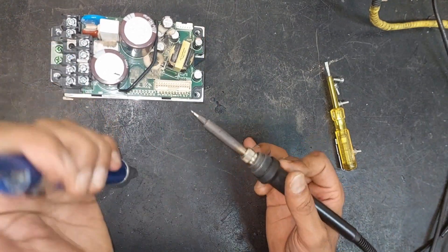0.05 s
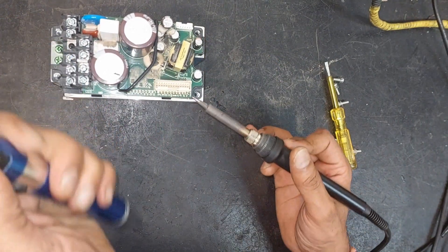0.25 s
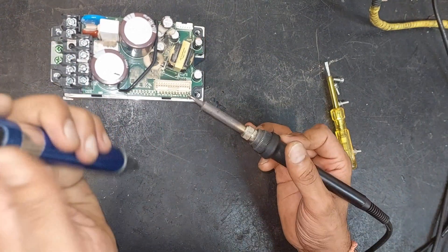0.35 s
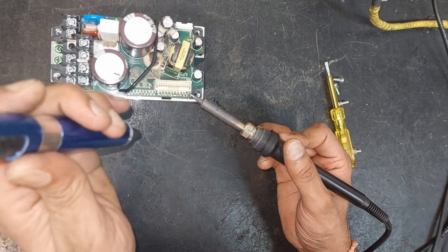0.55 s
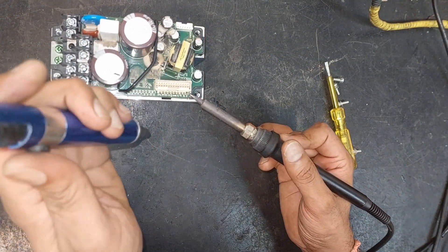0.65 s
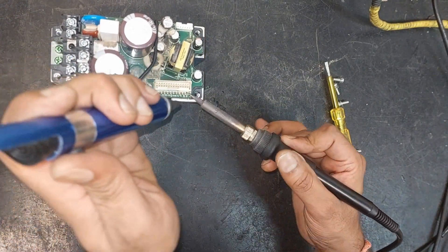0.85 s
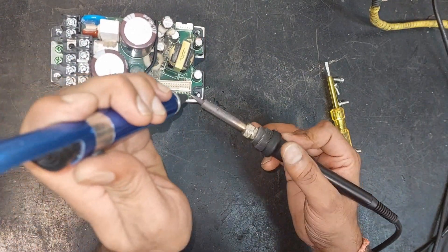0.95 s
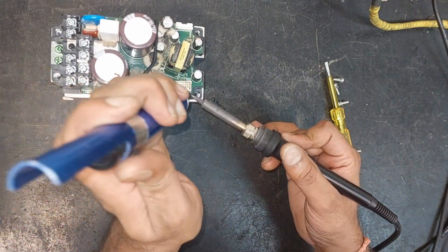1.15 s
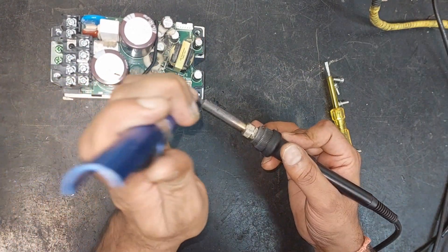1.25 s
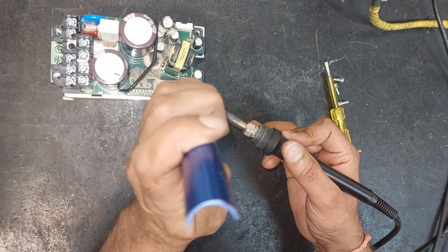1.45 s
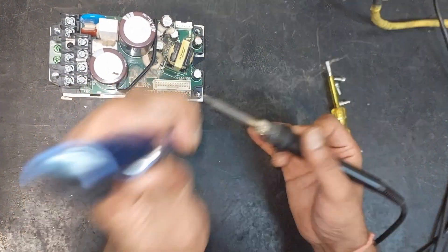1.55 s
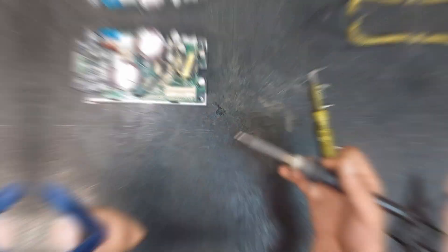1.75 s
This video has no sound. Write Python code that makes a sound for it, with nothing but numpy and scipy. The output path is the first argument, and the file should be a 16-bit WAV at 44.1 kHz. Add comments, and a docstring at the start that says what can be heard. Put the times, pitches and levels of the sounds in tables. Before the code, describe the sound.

A desoldering pump latches with a plastic snap, then releases with a springy clack.

```python
"""A hand-held desoldering pump, close up at a workbench, over the low fan hum of a small room.
A faint, thin hiss swells, the plunger latches with a dry plastic snap, and the hand bumps the barrel.
A good second later the plunger is released: it slams home, rebounds and rings its steel spring.
The hum sinks away, and the loose plunger ticks lightly as the pump is lifted."""
import sys
import numpy as np
from scipy import signal
from scipy.fft import rfft, irfft, next_fast_len
from scipy.io import wavfile
from scipy.ndimage import map_coordinates

SR = 44100
rng = np.random.default_rng(int(sys.argv[2]) if len(sys.argv) > 2 else 0)


def materialize(psi):
    """Save the field psi as 16-bit PCM at rate SR to the path in sys.argv[1].

    A 1-D psi becomes a single channel; in a 2-D psi each row is a channel.
    """
    bounded = np.clip(np.atleast_2d(psi).T, -1, 1)
    quanta = np.round(bounded * 32767).astype(np.int16)
    wavfile.write(sys.argv[1], SR, quanta)


N = 79380

# Blows of the released plunger. Each row: start in seconds, level in dB, the clatter's t60 in seconds,
# crack level in dB.
PLUNGER_BLOWS = [(1.4854, -48, 0.025, -53), (1.4942, -45.5, 0.026, -52), (1.4963, -30, 0.029, -33),
                 (1.5068, -41, 0.016, -55), (1.5094, -30.5, 0.028, -28), (1.523, -35, 0.02, -42),
                 (1.5255, -37.5, 0.029, -52)]
# The bright colour of clatter and rattle. Each row: frequency in Hz, level in dB.
CLATTER_COLOUR = [(300, -40.5), (1300, -8), (2700, -7), (4400, -3), (5100, 0.5), (7000, -4.5),
                  (8200, -14.5), (10500, -8), (12300, -18), (13700, -21), (15500, -40), (16400, -50)]
LEFT_RIGHT = np.array([[1], [-1]])
BLOW_ATTACK_S, SNAP_ATTACK_S = 0.00022, 0.0001


def amp(db):
    """Decibels to gain."""
    return 10 ** (np.asarray(db) / 20)


def along(points, hz):
    """Read a curve of (Hz, value) points on a log frequency axis."""
    f, v = np.transpose(points)
    return np.interp(np.log(hz + 1), np.log(f + 1), v)


def since(start):
    """Seconds since start for every sample, zero before it."""
    return np.maximum(np.arange(N) / SR - start, 0)


def strike(t, attack, t60):
    """A fast rise and an exponential fall of 60 dB in t60 seconds."""
    return (1 - np.exp(-t / attack)) * np.exp(-np.log(1000) * t / t60)


def swell(start, length, db):
    """A smooth rise and fall."""
    return amp(db) * np.sin(np.pi * np.minimum(since(start) / length, 1))


def wobble(rate):
    """A smooth random curve, rate knots a second."""
    return map_coordinates(rng.standard_normal(200), [np.arange(N) * rate / SR], mode="mirror")


def panned(x, db):
    """Raise the left side and lower the right by db."""
    return x * amp(db * LEFT_RIGHT)


def filtered(x, response):
    """Shape x with a complex frequency response."""
    size = next_fast_len(N + SR // 2)
    return irfft(rfft(x, size) * response(np.fft.rfftfreq(size, 1 / SR)), size)[..., :N]


def noise(colour, likeness):
    """Coloured stereo noise of rms 1; left-right likeness is one number or a curve over frequency."""
    def mid_side(hz):
        alike = likeness if np.isscalar(likeness) else along(likeness, hz)
        angle = np.arccos(alike) / 2
        return amp(along(colour, hz)) * np.vstack([np.cos(angle), np.sin(angle)])
    mid, side = filtered(rng.standard_normal((2, N)), mid_side)
    stereo = np.array([mid + side, mid - side])
    return stereo / np.sqrt(np.mean(stereo ** 2))


def in_room(x, room_db, bench_db):
    """Add the bench's early scatter and the room's short tail."""
    # The room's decay. Each row: frequency in Hz, t60 in seconds.
    room_decay = [(200, 0.23), (2500, 0.34), (5500, 0.26), (9000, 0.21), (13500, 0.21), (15500, 0.13)]
    length, build_up_s = SR // 2, 0.0075
    hz, t, spectra = signal.stft(rng.standard_normal((2, length)), SR, nperseg=256)
    spectra *= np.exp(-np.log(1000) * t / along(room_decay, hz)[:, None])
    tail = signal.istft(spectra, SR, nperseg=256)[1][:, :length]
    tail *= 1 - np.exp(-since(0)[:length] / build_up_s)
    early = rng.standard_normal(tail.shape) * strike(since(0.0016)[:length], attack=0.00048, t60=0.026)
    echo = amp(room_db) * tail / np.linalg.norm(tail[0])
    echo += amp(bench_db) * early / np.linalg.norm(early[0])
    return x + signal.fftconvolve(x, echo, axes=1)[:, :N]


def fan():
    """A bed of air and wavering tones from a fan on the right; it sinks after the release."""
    # The fan's tones. Each row: frequency in Hz, level in dB against the air.
    hum_tones = [(123.8, -19), (393, -16), (484.5, -16), (683.7, -20), (787, -19)]
    # The air's dark colour. Each row: frequency in Hz, spectral density in dB.
    air_colour = [(15, -68), (25, -30), (40, -22.5), (60, -11), (82, -9.5), (118, -0.5), (220, -8.5),
                  (300, -5.5), (378, -6), (430, -11.5), (482, -7.5), (567, -12), (666, -9), (826, -11),
                  (1300, -11.5), (2700, -17.5), (5430, -30.5), (7100, -43), (15500, -66)]
    # The air's stereo image. Each row: frequency in Hz, left-right likeness (1 is mono).
    air_likeness = [(60, 0.96), (200, 0.91), (330, 0.7), (520, 0.85), (950, 0.048), (1150, 0.34),
                    (1600, 0.41), (2600, 0.097), (4000, 0.073)]
    # The bed's fader ride. Each row: time in seconds, level in dB.
    fader = [(0, -55), (.12, -55), (.3, -52), (.9, -52.5), (1.4, -53), (1.5, -55.5), (1.62, -62.5),
             (1.7, -65.5), (1.8, -74)]
    flutter_db, drift_rad = 2.5, 1.15
    lag_s, lag_above_hz = 0.00042, 420  # the highs reach the left side late
    t, hum = since(0), np.zeros(N)
    for hz, db in hum_tones:
        peak = np.sqrt(2) * amp(db + flutter_db * wobble(7.79))
        hum += peak * np.sin(2 * np.pi * hz * t + drift_rad * wobble(8.97))

    def left_late(hz):
        delay = lag_s * hz ** 2 / (hz ** 2 + lag_above_hz ** 2)
        return np.exp(-1j * np.pi * hz * delay * LEFT_RIGHT)
    bed = filtered(noise(air_colour, air_likeness) + hum, left_late)
    return panned(amp(np.interp(t, *np.transpose(fader))) * bed, db=-0.43)


def hiss_and_rattle():
    """A faint, thin, grainy hiss swells just before the snap and twice later; the spring rattles out."""
    # Swells of hiss. Each row: start in seconds, length in seconds, level in dB.
    hiss_swells = [(0.139, 0.032, -67), (0.153, 0.068, -67), (0.557, 0.039, -67.5), (1.685, 0.13, -81)]
    # Their thin colour. Each row: frequency in Hz, level in dB.
    hiss_colour = [(1500, -36), (3500, 2), (5500, 0.5), (8000, -18.5), (12500, -22), (15000, -38)]
    # The spring's rattle: start in seconds, length in seconds, level in dB.
    rattle_swell = (1.503, 0.11, -61)
    hiss = sum(swell(*row) for row in hiss_swells) * noise(hiss_colour, likeness=0.23)
    rattle = swell(*rattle_swell) * noise(CLATTER_COLOUR, likeness=0.2)
    grain = amp(2.9 * wobble(100))
    return (hiss + rattle) * grain


def hand():
    """Damped bumps and short scuffs of the barrel in the grip, with no deep bass below them."""
    # Dull bumps. Each row: start in seconds, level in dB, pitch in Hz, t60 in seconds, left pan in dB.
    knocks = [(0.125, -52.5, 136.7, 0.36, 1.5), (0.239, -47.5, 133, 0.13, 1),
              (.2798, -32.5, 750, 0.01, 0.5), (0.2822, -37, 262, 0.032, 1.5),
              (0.3036, -43.5, 162, 0.049, 1), (.422, -49, 150, 0.044, 0.5), (1.494, -43, 165, 0.069, 1),
              (1.5088, -28.5, 950, 0.0052, 4.5), (1.5126, -40, 153, 0.053, -1)]
    # Scuffs of the hand. Each row: start in seconds, level in dB, t60 in seconds.
    rubs = [(0.245, -49, 0.18), (0.2774, -40.5, 0.072)]
    # Their soft colour. Each row: frequency in Hz, level in dB.
    scuff_colour = [(100, -21), (400, 11), (1000, -2.5), (2000, -1.5), (5500, -8), (8000, -25),
                    (14000, -42)]
    bumps = np.zeros((2, N))
    for start, db, hz, t60, pan in knocks:
        t = since(start)
        bumps += panned(amp(db) * strike(t, 0.00053, t60) * np.sin(2 * np.pi * hz * t), pan)
    scuffing = sum(amp(db) * strike(since(start), 0.0011, t60) for start, db, t60 in rubs)
    scuffs = scuffing * noise(scuff_colour, likeness=0.78)
    low_cut = signal.butter(2, 68, "highpass", fs=SR, output="sos")
    return in_room(signal.sosfilt(low_cut, bumps + scuffs), room_db=-14.5, bench_db=-5)


def plastic_clicks(hits, modes):
    """Each hit gives a tiny crack and briefly rings the plastic; the ring reaches the right first."""
    # The crack's colour. Each row: frequency in Hz, level in dB.
    crack_colour = [(700, -32), (2500, 6.5), (5500, 2.5), (7500, -5.5), (12500, -7), (15500, -22)]
    left_lag_s, crack_db = 0.00005, -11
    body, snaps = np.zeros((2, N)), np.zeros(N)
    for start, db, pitch in hits:
        span = slice(int(start * SR), int(start * SR) + SR // 10)
        t = np.array([since(start + left_lag_s), since(start)])[:, span]
        for k, (hz, mode_db, t60) in enumerate(modes):
            tone = (-1) ** k * np.sin(2 * np.pi * hz * pitch * t)  # modes alternate in polarity
            body[:, span] += amp(db + mode_db) * strike(t, SNAP_ATTACK_S, t60) * tone
        snaps += amp(db + crack_db) * strike(since(start), SNAP_ATTACK_S, t60=0.013)
    crack = snaps * noise(crack_colour, likeness=0.16)
    clicks = in_room(body, room_db=-15, bench_db=-15) + in_room(crack, room_db=-7, bench_db=-5)
    return panned(clicks, db=-1)


def cap_ticks():
    """The loose plunger ticks and rings its cap as the pump is lifted."""
    # Light ticks. Each row: start in seconds, level in dB, pitch factor.
    ticks = [(1.7638, -59, 1), (1.7837, -47.5, 1.0), (1.7864, -44, 0.97)]
    # The cap's modes. Each row: frequency in Hz, level in dB, t60 in seconds.
    cap_modes = [(2670, -3, 0.021), (3370, -1.5, 0.015), (3750, -2.5, 0.013), (4550, -5, 0.012),
                 (5400, -3.5, 0.0056), (7060, -12, 0.0087), (11000, -23, 0.0044)]
    return plastic_clicks(ticks, cap_modes)


def latch():
    """The latch catches with a dry snap, then the barrel shifts in the grip."""
    # The snap and its small followers. Each row: start in seconds, level in dB, pitch factor.
    clicks = [(0.2154, -16.5, 1.0), (.2195, -36, 0.96), (.2237, -47.5, 0.93), (.2792, -43.5, 1.0)]
    # Modes of latch and barrel. Each row: frequency in Hz, level in dB, t60 in seconds.
    barrel_modes = [(1775, -25, 0.014), (2065, -22, 0.044), (2560, -5, 0.013), (2940, -4, 0.0092),
                    (3683, -0.5, 0.012), (4020, -2, 0.009), (4640, -10.5, 0.01), (4920, -20, 0.058),
                    (5350, -2, 0.014), (5890, -8, 0.012), (7040, -15.5, 0.0099), (8740, -20.5, 0.019),
                    (10800, -17, .006), (12440, -25, 0.0076)]
    return plastic_clicks(clicks, barrel_modes)


def spring():
    """Every blow adds energy to the coil's modes, which waver as the turns touch."""
    # Modes of spring and rod. Each row: frequency in Hz, level in dB, t60 in seconds.
    coil_modes = [(4905, -18.5, 0.16), (4975, -10, 0.1), (5107, -18, 0.077), (5330, -30, .23),
                  (5600, -23, 0.24), (6000, -30, 0.12), (6740, -17, 0.068), (7250, -20.5, 0.05),
                  (10360, -25, 0.052), (13700, -25, .06)]
    waver_rad, spread_rad = 0.32, 1
    t, ring = since(0), np.zeros((2, N))
    for hz, mode_db, t60 in coil_modes:
        energy = sum((amp(db) * strike(since(start), BLOW_ATTACK_S, t60)) ** 2
                     for start, db, _, _ in PLUNGER_BLOWS)
        phase = 2 * np.pi * hz * t + waver_rad * wobble(111) + spread_rad * LEFT_RIGHT / 2
        ring += amp(mode_db) * np.sqrt(energy) * np.sin(phase)
    return ring


def plunger_slam():
    """The freed plunger hits its stop and rebounds; every blow cracks, clatters and rings the spring."""
    # The steely edge of a blow. Each row: frequency in Hz, level in dB.
    steel_colour = [(1000, -22), (3500, -7), (6000, 7), (8300, -17), (11000, -2), (14000, -8), (16400, -25)]
    lead_s, likeness = 0.00016, 0.26  # the plunger is nearer the left side
    clatter, crack = np.zeros((2, N))
    for start, db, t60, crack_db in PLUNGER_BLOWS:
        clatter += amp(db) * strike(since(start), BLOW_ATTACK_S, t60)
        crack += amp(crack_db) * strike(since(start), SNAP_ATTACK_S, t60=0.0088)
    impacts = clatter * noise(CLATTER_COLOUR, likeness) + crack * noise(steel_colour, likeness)
    impacts = filtered(impacts, lambda hz: np.exp(1j * np.pi * hz * lead_s * LEFT_RIGHT))
    return panned(spring() + in_room(impacts, room_db=-15.5, bench_db=-8.5), db=1)


def scene():
    """Pump and hand over the fan bed."""
    return latch() + cap_ticks() + plunger_slam() + hiss_and_rattle() + hand() + fan()


def record(dry):
    """A brick-wall high cut takes off the very top."""
    return filtered(dry, lambda hz: hz < 16400)


dry = scene()
out = record(dry)
materialize(out)
```